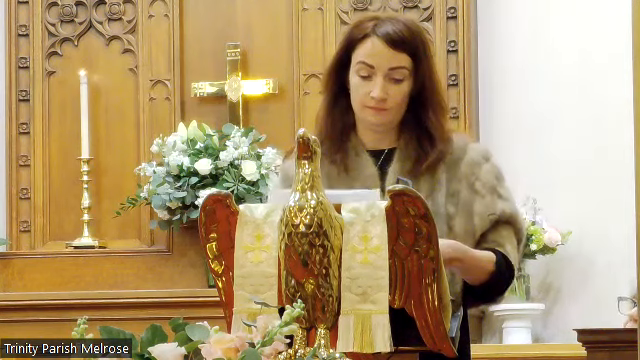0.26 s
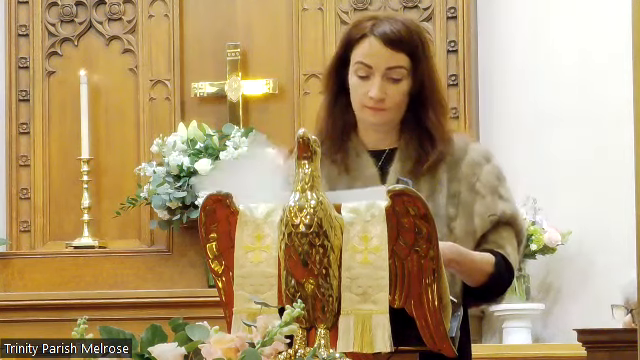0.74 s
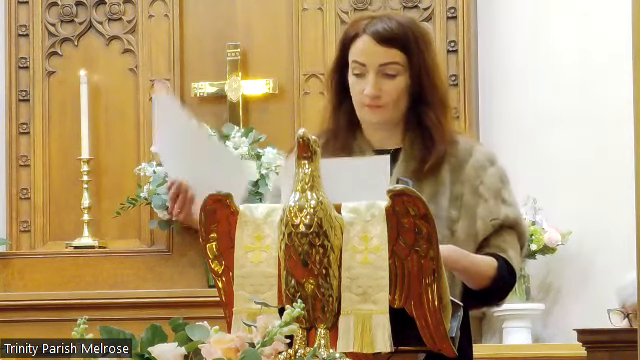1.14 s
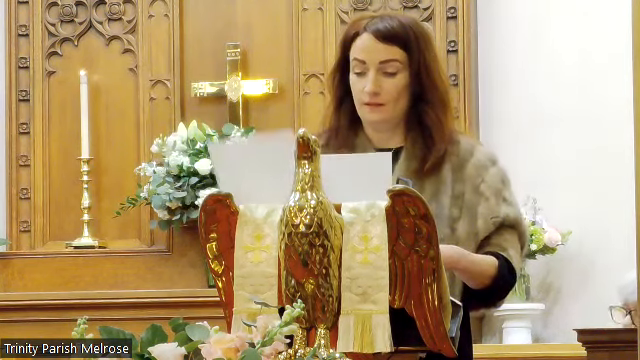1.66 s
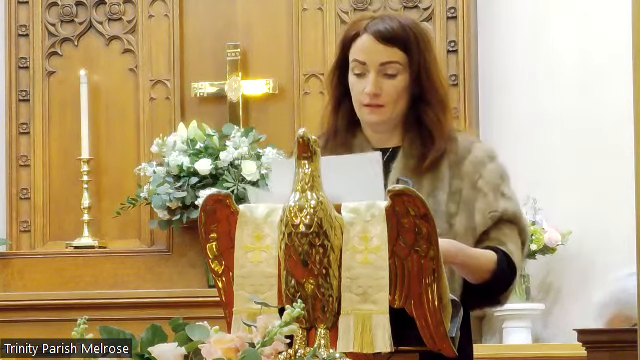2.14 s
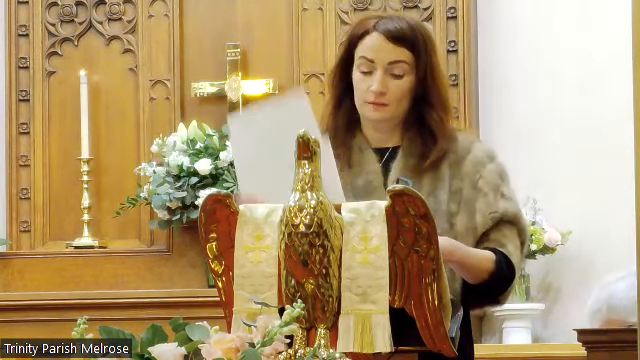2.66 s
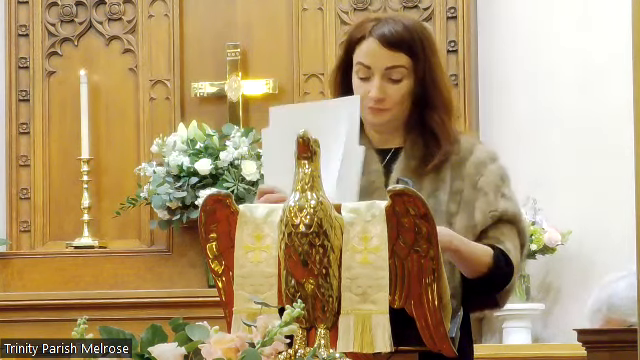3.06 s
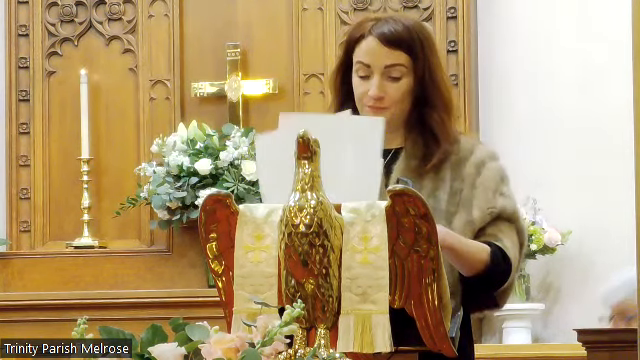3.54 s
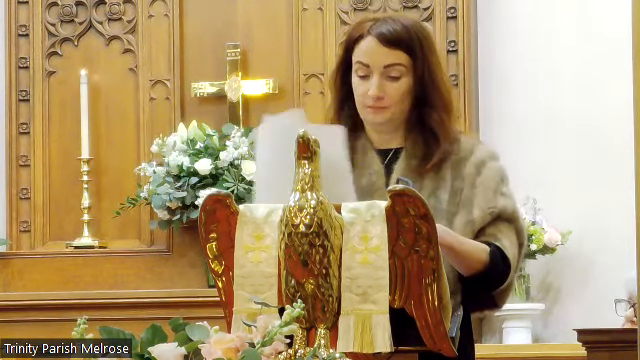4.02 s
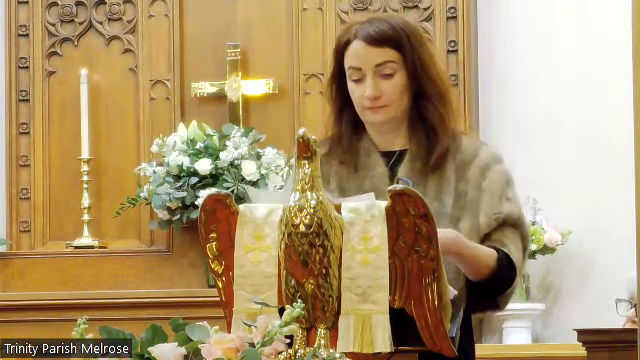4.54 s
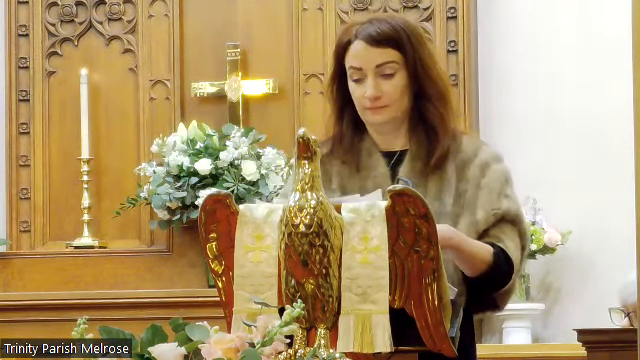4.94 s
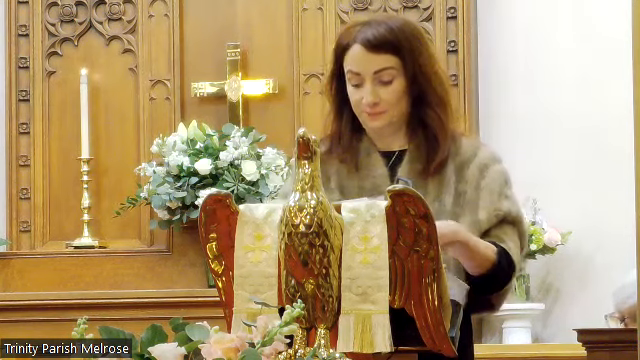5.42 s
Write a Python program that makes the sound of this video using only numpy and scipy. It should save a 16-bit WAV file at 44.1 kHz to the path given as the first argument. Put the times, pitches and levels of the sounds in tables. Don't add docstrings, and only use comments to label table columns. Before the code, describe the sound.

Sheets of paper rustle, flap and snap close to a microphone on a wooden lectern, with dull thumps and knocks in a faintly echoing hall.

```python
import sys
import numpy as np
from scipy import signal
from scipy.io import wavfile
from scipy.ndimage import uniform_filter1d

SR = 44100
rng = np.random.default_rng(int(sys.argv[2]) if len(sys.argv) > 2 else 0)


def gain_from_decibels(decibels):
    exponent = np.asarray(decibels, float) / 20
    return 10 ** exponent


def wav_out(sig):
    wavfile.write(sys.argv[1], SR, np.round(np.clip(np.atleast_2d(sig).T, -1, 1) * 32767).astype(np.int16))


N = 250926

# pitch_hz, width_hz, level_db
SHEET_RINGS = [
    [(1480, 66, -11), (1720, 202, 6)],
    [(2230, 236, 4), (2547, 250, 1.5), (2870, 310, 3), (3340, 380, 1)],
    [(4177, 400, 1), (4605, 310, 5)],
    [(5863, 320, -3.5), (6375, 540, 11)],
]
# pitch_hz, width_hz, level_db
WOOD_PARTS = [
    [(57, 71, -8.5), (89.7, 13.8, -1.5), (124, 28, -3.5)],
    [(193.3, 36, -11), (252.3, 45, -4.5), (304.5, 42, -4.5), (365, 62, -6.5)],
    [(633, 51, -15), (685.3, 70, -3), (765, 149, -2), (857, 93, -10)],
    [(1040, 226, 6), (1165.4, 68, 7)],
]
# start_s, peak_db, pitch_hz, treble_db (re peak), t60_s
CREASE_SNAPS = [(0.204, -22.5, 1810, -11.5, 0.034), (0.261, -33, 2290, -29.5, 0.018),
                (0.574, -38.5, 900, 0, 0.043), (4.205, -34.5, 660, -36, 0.024),
                (0.7445, -29.5, 2460, -12, 0.012), (0.774, -33.5, 2230, -15.5, 0.017),
                (0.791, -38.5, 2230, -11, 0.05), (1.452, -38.5, 1720, -10, 0.062),
                (1.46, -26, 1780, -20, 0.11), (1.609, -31, 1740, -28, 0.037),
                (1.88, -27, 1480, -11.5, 0.068), (2.481, -36, 1610, -31, 0.029),
                (0.459, -41.5, 1490, -27, 0.05), (0.992, -34, 1910, -16, 0.025),
                (3.576, -36, 4100, -11, 0.03), (3.003, -31, 2440, -0.5, 0.037),
                (4.31, -42, 1680, -14.5, 0.023), (2.57, -32, 1900, -8, 0.02), (1.897, -32, 1500, -10, 0.02),
                (0.17, -34, 1800, -10, 0.03), (1.952, -30, 4650, -13, 0.016),
                (4.911, -35, 2084, -12.5, 0.017), (2.979, -29, 2430, -6, 0.04),
                (3.257, -30, 3600, -22, 0.11), (3.352, -32.5, 1820, -20.5, 0.016),
                (3.618, -20.5, 2580, -58.5, 0.073), (3.838, -32.5, 648, -26, 0.034),
                (4.289, -38, 880, -31.5, 0.086), (4.35, -33.5, 3130, -5.5, 0.077),
                (4.4, -26, 3270, -19, 0.076), (4.469, -33, 2180, -12, 0.077),
                (4.582, -37.5, 2194, -6.5, 0.03), (4.87, -40, 4170, -5, 0.017),
                (5.534, -35.5, 4530, -22, 0.069)]
# start_s, peak_db, pitch_hz, crack_db (re peak), t60_s
WOOD_KNOCKS = [(0.004, -22, 118, -1.5, 0.12), (0.385, -40.5, 313.1, -15, 0.77),
               (0.567, -26.5, 273, 2, 0.061), (0.597, -35.5, 219, -12, 0.12), (1.452, -9, 116, -44, 0.089),
               (1.549, -30, 93, -23, 0.16), (1.599, -27, 94, -17, 0.16), (1.926, -40.5, 87.2, 10, 0.41),
               (3.525, -31, 213, 6, 0.053), (3.363, -23, 149, -4.5, 0.04), (3.476, -31.5, 344, 5.5, 0.097),
               (3.607, -21.5, 254.4, 2.5, 0.097), (3.697, -29, 247, 0, 0.094),
               (3.849, -37.5, 217, 11, 0.18), (3.953, -38.5, 286, 8.5, 0.14),
               (4.173, -29.5, 238, -25, 0.17), (4.209, -38.5, 253, -19, 0.17),
               (4.293, -19.5, 113.2, -29, 0.07), (4.347, -20, 110.6, -2.5, 0.18),
               (4.383, -27.5, 91, -17, 0.3)]
# time_s, pitch_hz, level_db
FINGER_SQUEAK = [
    (5.435, 540, -80),
    (5.452, 570, -50),
    (5.504, 558, -67.5),
    (5.532, 639, -52.5),
    (5.554, 762, -61.5),
    (5.572, 740, -67),
    (5.58, 660, -70),
    (5.594, 626, -75),
    (5.66, 680, -87),
]
# pitch_hz, level_db (per bin)
DUCK_THRESHOLD = [(60, -100), (105, -100), (170, -96.5), (350, -99), (1000, -64), (2000, -90), (5400, -135),
                  (8000, -100), (15000, -102)]
# peak_s, level_db, rise_s, fall_s, tilt_db (per ring)
SHEET_STROKES = [(0.004, -52, 0.72, 0.15, -1.5), (0.106, -46, 0.017, 0.057, 0.5),
                 (0.205, -56.5, 0.13, 0.046, 6.5), (0.505, -67, 0.3, 0.24, -5),
                 (0.745, -60.5, 0.76, 0.047, 2.2), (1.005, -49.5, 0.13, 0.17, 0),
                 (1.285, -86, 0.1, 0.27, -12), (1.357, -86.5, 0.49, 0.43, -10.5),
                 (1.458, -53.5, 0.016, 0.26, -7), (1.61, -73, 0.029, 0.39, -9.5),
                 (1.76, -60, 0.034, 0.66, -5), (1.877, -52, 0.018, 0.31, -2.4),
                 (2.663, -56.5, 0.88, 0.58, 0.5), (3.007, -45, 0.11, 0.16, 1.5),
                 (3.534, -66, 0.899, 0.53, -1), (3.619, -44.5, 0.041, 0.1, 1.2),
                 (3.725, -50.5, 0.16, 0.12, 0), (3.962, -53.5, 0.33, 0.13, 0.2),
                 (4.304, -51, 0.037, 0.17, 0.5), (4.919, -49.5, 0.2, 0.11, 1), (5.301, -58, 0.49, 0.07, 0.3),
                 (5.5, -65, 1, 0.043, -1),
                 (0.203, -47, 0.34, 0.17, 0.5), (0.565, -51, 0.14, 0.076, 3), (0.586, -50, 0.069, 0.025, -3),
                (0.598, -54, 0.017, 0.048, -4), (0.899, -53, 0.87, 0.15, 1.5),
                (1.492, -61.5, 0.044, 0.1, 5.5), (1.782, -63, 0.097, 0.98, 9),
                (1.99, -44, 0.058, 0.072, 4.5), (2.293, -56.5, 0.25, 0.26, 4), (1.935, -48, 0.18, 0.15, 4),
                (2.04, -53.5, 0.06, 0.18, 3.5), (2.2, -57.5, 0.015, 0.78, 0.5),
                (5.434, -50.5, 0.13, 0.032, 3), (5.29, -59.5, 0.28, 0.09, 2), (2.554, -42.5, 0.13, 0.28, 3),
                (2.981, -50, 0.013, 0.98, 1), (3.266, -46.5, 0.043, 0.58, 1.7),
                (3.482, -44.5, 0.11, 0.17, 3.5), (3.594, -51, 0.47, 0.12, 1.5),
                (4.168, -64, 0.19, 0.33, 3.5), (4.355, -43, 0.071, 0.074, 1), (4.395, -48, 0.025, 0.056, 5),
                (4.469, -47, 0.22, 0.15, 1.5), (4.59, -48, 0.067, 0.12, 3.5),
                (4.868, -52.5, 0.056, 0.16, 5.5), (5.164, -61, 0.075, 0.74, 5), (5.467, -46, 0.11, 0.16, 3),
                (5.542, -47.5, 0.04, 0.073, 2),
                 (0.517, -50, 0.0065, 0.13, 2.5), (0.609, -43.5, 0.052, 0.013, 3),
                 (0.662, -49, 0.018, 0.032, 1.5), (0.746, -49, 0.09, 0.017, 1.5),
                 (1.39, -78.5, 0.039, 0.14, 4.5), (1.3, -70, 0.013, 0.09, 3.5),
                 (2.132, -57.5, 0.08, 0.034, 4), (2.614, -49, 0.056, 0.034, 6.5),
                 (3, -45.5, 0.058, 0.019, 0.5), (2.76, -56.5, 0.32, 0.095, 3.5),
                 (3.7, -53, 0.14, 0.027, -2.5), (1.68, -74.5, 0.13, 0.15, 0.5),
                 (1.55, -68.5, 0.1, 0.077, 2.5), (3.8, -58, 0.15, 0.097, 2), (3.68, -57, 0.1, 0.1, 3),
                 (2.6, -49.5, 0.04, 0.03, 3), (2.86, -71, 0.067, 0.092, 2.5), (5.2, -65, 0.15, 0.14, 6),
                 (4.773, -68, 0.029, 0.048, 4.5), (5.105, -62, 0.044, 0.17, 2), (1.14, -79.5, 0.2, 0.4, 4),
                 (0.11, -57, 0.01, 0.081, 3), (4.838, -62.5, 0.013, 0.068, 2.5),
                 (3.96, -65.5, 0.073, 0.16, 5), (3.32, -50.5, 0.08, 0.11, 2), (2.93, -67, 0.03, 0.08, -3),
                 (0.775, -54.5, 0.008, 0.025, -1), (0.792, -49.5, 0.012, 0.08, 0.5),
                 (4.615, -50, 0.09, 0.031, 1), (3.462, -48.5, 0.015, 0.13, 5)]
# peak_s, level_db, rise_s, fall_s, place (0
WOOD_CONTACTS = [(0.001, -33, 0.1, 0.17, 0.7), (0.011, -27, 0.22, 0.028, 0.25), (0.455, -44, 1, 0.39, 1.32),
                 (0.586, -35.5, 0.095, 0.1, 0.87), (0.83, -55, 0.05, 0.3, 1.7),
                 (1.457, -27, 0.011, 0.41, 0.05), (1.465, -53.5, 0.031, 0.45, 0.05),
                 (1.523, -42.5, 0.058, 0.13, 0.76), (1.575, -31, 0.077, 0.15, 0.04),
                 (1.97, -44, 0.17, 0.24, 0.093), (2.61, -48, 0.044, 0.37, 1.39),
                 (2.8, -42, 0.11, 0.25, 1.26), (3.36, -37.5, 0.033, 0.18, 1.1),
                 (3.396, -35, 0.033, 0.19, 0.18), (3.535, -36.5, 0.34, 0.26, 1.05),
                 (3.612, -33.5, 0.04, 0.16, 1.01), (3.743, -34, 0.073, 0.073, 0.55),
                 (3.974, -44.5, 0.35, 0.15, 1.42), (4.15, -42.5, 0.028, 0.12, 0.98),
                 (4.206, -36, 0.047, 0.11, 0.9), (4.294, -28, 0.029, 0.36, 0.27),
                 (4.4, -37, 0.29, 0.25, 0.059), (4.5, -43, 0.15, 0.11, 0.27),
                 (4.626, -60.5, 0.8, 0.055, 1.6),
                 (0.017, -50.5, 0.483, 0.15, 2.43), (0.195, -48, 0.54, 0.16, 2.19),
              (1.014, -57, 0.19, 0.17, 1.78), (1.61, -50.5, 0.21, 0.56, 2.1),
              (1.894, -40, 0.019, 0.1, 2.03), (1.987, -50.5, 0.099, 0.36, 2.24),
              (2.539, -62.5, 0.11, 0.34, 3.0), (2.65, -52, 0.12, 0.087, 2.05),
              (3.004, -49.5, 0.33, 0.11, 1.36), (3.049, -60, 0.032, 0.12, 2.56),
              (3.173, -47.5, 0.11, 0.097, 1.81), (3.403, -46.5, 0.85, 0.14, 1.59),
              (3.616, -43, 0.023, 0.12, 2.55), (3.719, -46.5, 0.063, 0.069, 2.44),
              (3.853, -41.5, 0.042, 0.24, 1.54),
                 (0.126, -52, 0.04, 0.07, 2.95), (0.4, -65, 0.067, 0.19, 1.4), (0.937, -60, 0.16, 0.4, 1.9),
                 (1.279, -72, 0.2, 0.3, 1.8), (2.198, -71.5, 0.3, 0.93, 2.96),
                 (4.07, -53.5, 0.084, 0.06, 1), (4.205, -60, 0.017, 0.046, 1.4),
                 (4.37, -51, 0.16, 0.32, 2.3), (5.06, -66, 0.12, 0.36, 1.63),
                 (5.26, -73.5, 0.31, 0.14, 0.58), (0.26, -44, 0.13, 0.08, 0.83),
                 (0.53, -57, 0.036, 0.0805, 0.18), (2.12, -63, 0.056, 0.13, 1.3),
                 (2.3, -72.5, 0.3, 0.3, 1.46), (5.52, -70, 0.24, 0.32, 1.4), (1.3, -75.5, 0.32, 0.15, 1.8),
                 (4.1, -67.5, 0.17, 0.084, 2.5), (4.6, -62, 0.13, 0.16, 2.2), (0.68, -67.5, 0.2, 0.21, 2.7),
                 (3.6, -60, 0.18, 0.27, 2.4), (4.62, -58, 0.061, 0.059, 0.53),
                 (2.795, -51, 0.013, 0.076, 2)]
SHEET_DRIVE = [2, 3, 1.33, -5, -0.97]
WOOD_DRIVE = [-7.5, -2.5, -1.1, 10]
# start_s, end_s, start_hz, end_hz, depth_db
PAGE_NOTCHES = [(0, 0.52, 3900, 3900, -22), (0.2, 0.605, 2000, 1900, -16), (1.3, 1.82, 5200, 5700, -15),
                (2.1, 2.53, 5700, 5500, -6.5), (2.25, 2.52, 3530, 4100, -8), (1, 2.9, 4000, 3900, -8),
                (4.5, 4.85, 3800, 3350, -5), (-0.5, 0.15, 5300, 5300, -8), (0.8, 1.6, 3600, 3800, -10),
                (0.3, 0.58, 5000, 5400, -12), (3, 3.23, 5050, 5200, -8), (5, 4.1, 5700, 5700, -4),
                (4, 4.36, 5200, 5700, -10.5), (3.5, 4.33, 2020, 1960, -16.5), (3.95, 4.28, 4000, 3600, -5),
                (5.06, 5.4, 5420, 5430, -16), (2.7, 2.97, 1400, 1150, -18), (4.62, 5.8, 1250, 1330, -18),
                (1.2, 1.44, 1420, 1400, -18), (1.26, 1.35, 6400, 6400, -14), (4.02, 4.65, 1150, 1150, -7)]
# peak_s, level_db, rise_s, fall_s
STAND_SWAYS = [
    (0.92, -75.5, 0.33, 0.26),
    (1.78, -51, 0.12, 0.22),
    (2.15, -67, 0.13, 0.29),
    (2.47, -74, 0.15, 0.3),
    (4.7, -66.5, 0.2, 0.27),
    (4.95, -77, 0.15, 0.2),
    (5.24, -73.5, 0.22, 0.13),
    (3.0, -76, 0.28, 0.3),
]
# peak_s, level_db, rise_s, fall_s, pitch_hz
CONTACT_GROANS = [(0.725, -57, 0.02, 0.08, 305), (0.815, -49, 0.035, 0.14, 345),
                  (0.77, -55.5, 0.08, 0.13, 400), (0.82, -59, 0.045, 0.085, 750),
                  (0.98, -60, 0.12, 0.12, 645), (1.29, -66, 0.07, 0.13, 1400), (1.2, -66, 0.12, 0.14, 1710),
                  (1.39, -77, 0.05, 0.06, 4680), (1.4, -80, 0.08, 0.06, 7700), (2.68, -46, 0.1, 0.03, 308),
                  (2.62, -51, 0.035, 0.08, 312), (2.785, -48, 0.07, 0.067, 310),
                  (2.835, -43.5, 0.056, 0.038, 185), (2.8, -52, 0.042, 0.091, 770),
                  (3.0, -55, 0.071, 0.092, 345), (3.18, -52.5, 0.052, 0.15, 370),
                  (3.285, -48, 0.07, 0.08, 1700), (2.06, -59.5, 0.047, 0.096, 350),
                  (4.62, -60, 0.083, 0.085, 280), (5.6, -70, 0.11, 0.077, 630),
                  (4.31, -49, 0.03, 0.043, 790)]

STROKE_SPAN_DB = 30
STROKE_BEND = 1.044


def unit(x):
    return x / np.sqrt(np.mean(x ** 2))


def band(x, hz, width):
    edges = np.sqrt(hz ** 2 + width ** 2 / 4) + np.array([-width, width]) / 2
    return signal.sosfilt(signal.butter(2, edges, "band", fs=SR, output="sos"), x)


def highpass(x, order, hz):
    return signal.sosfilt(signal.butter(order, hz, "high", fs=SR, output="sos"), x)


def smooth(x, k):
    return uniform_filter1d(uniform_filter1d(x, k), k)


def walk(rate):
    k = int(SR / rate)
    held = np.repeat(rng.standard_normal(N // k + 1), k)
    return 0.87 * smooth(held, k)[:N]


def patchwork(shape, frames, bins):
    patches = uniform_filter1d(rng.standard_normal(shape), size=frames, axis=1)
    return unit(uniform_filter1d(patches, size=bins, axis=0))


def add(out, s, sound):
    i = int(s * SR)
    out[i:i + len(sound)] += sound[:N - i]


def strokes(rows, share_db):
    s, db, rise, fall = np.transpose(rows)[:4, :, None]
    t = np.arange(0, N + 64, 64) / SR
    distance = np.where(t < s, (s - t) / rise, (t - s) / fall)
    swell_db = db - STROKE_SPAN_DB * np.abs(distance) ** STROKE_BEND
    power = gain_from_decibels(share_db) ** 2 @ gain_from_decibels(swell_db) ** 2
    return [np.interp(np.arange(N) / SR, t, 10 * np.log10(p + 1e-13)) for p in power]


def friction(rate, spread_db, grit_db, flutter_hz, flutter_db):
    size = gain_from_decibels(spread_db * np.minimum(rng.exponential(size=N), 2.1))
    slips = (rng.random(N) < rate / SR) * rng.choice([-1, 1], N) * size
    grain = rng.standard_normal(N) + gain_from_decibels(grit_db) * unit(slips)
    return gain_from_decibels(flutter_db * walk(flutter_hz)) * grain


def ring(push, parts, levels_db, patchy_db, patch_rate, firm_db, blur, bent=unit):
    out = 0
    for modes, db in zip(parts, levels_db):
        clear = 0
        for k, (hz, width, mode_db) in enumerate(modes):
            tone = unit(band(band(push, hz, 0.98 * width), hz, width))
            clear = clear + (-1) ** k * gain_from_decibels(mode_db + patchy_db * walk(patch_rate)) * tone
        low, high = modes[0][0] / blur, modes[-1][0] * blur
        middle = np.sqrt(low * high)
        broad = band(band(push, middle, 2.17 * (high - low)), middle, high - low)
        share = 0.4 + 0.6 / (1 + gain_from_decibels(firm_db - db) ** 3)
        out = out + gain_from_decibels(db) * (np.sqrt(1 - share) * bent(clear) + np.sqrt(share) * bent(broad))
    return out


def air():
    return gain_from_decibels(-77) * rng.standard_normal(N)


def hall(x):
    t60_s, level_db, top_hz = 0.7, -17.5, 3700
    t = np.arange(SR) / SR
    noise = band(rng.standard_normal(SR), top_hz / 3, top_hz)
    tail = (t > 0.018) * gain_from_decibels(-60 * t / t60_s) * noise
    return gain_from_decibels(level_db) * signal.fftconvolve(x, tail / np.sqrt(np.sum(tail ** 2)))[:N]


def stand_hum(push):
    sway_db, = strokes(STAND_SWAYS, np.zeros((1, len(STAND_SWAYS))))
    level = np.hypot(gain_from_decibels(-85.5), gain_from_decibels(sway_db)) * gain_from_decibels(1.5 * walk(6.3))
    hz, width = WOOD_PARTS[0][1][:2]
    return level * unit(band(push, hz, width))


def rubbing():
    push = friction(rate=300, spread_db=11.5, grit_db=-7.0, flutter_hz=30.24, flutter_db=-0.5)
    rows = np.array(WOOD_CONTACTS)
    away = abs(np.arange(len(WOOD_PARTS))[:, None] - rows[:, -1])
    neighbour_db = -14.5
    stand_db, *top_db = strokes(rows, np.array(WOOD_DRIVE)[:, None] + neighbour_db * away)
    levels_db = [np.minimum(stand_db, -42), *top_db]
    wood = ring(push, WOOD_PARTS, levels_db, patchy_db=5.0, patch_rate=11, firm_db=-46.0, blur=1.077)
    return stand_hum(push) + wood


def groans():
    wobble, flutter_db = 0.11, 6
    out, t = np.zeros(N), np.arange(-8000, 12000) / SR
    drift, flutter = walk(90), walk(75)
    for s, db, rise, fall, hz in CONTACT_GROANS:
        at = np.clip(((s + t) * SR).astype(int), 0, N - 1)
        swell_db = db - STROKE_SPAN_DB * np.where(t < 0, -t / rise, t / fall) ** 2
        cycles = hz * np.cumsum(1 + wobble * np.sqrt(300 / hz) * drift[at]) / SR
        level = np.sqrt(2) * gain_from_decibels(swell_db + flutter_db * flutter[at])
        add(out, s + t[0], level * np.sin(2 * np.pi * cycles))
    return out


def squeak():
    t = np.arange(N) / SR
    s, hz, db = np.transpose(FINGER_SQUEAK)
    pitch, level_db = np.interp(t, s, hz), np.interp(t, s, db)
    on = uniform_filter1d(1. * (t > s[0]) * (t < s[-1]), size=300)
    cycles = np.cumsum(pitch * (1 + 0.0697 * walk(240))) / SR
    return 1.38 * on * gain_from_decibels(level_db + 4.2 * walk(110)) * np.sin(2 * np.pi * cycles)


def knocks():
    out, t = np.zeros(N), np.arange(16000) / SR
    rise = 1 - np.exp(-(t / 0.009) ** 3)
    for s, db, hz, crack_db, t60 in WOOD_KNOCKS:
        body = gain_from_decibels(-60 * t / t60) * np.sin(2 * np.pi * hz * t)
        heavy = hz < 160
        stand = heavy * 0.17 * gain_from_decibels(-60 * t / 0.277) * np.sin(2 * np.pi * WOOD_PARTS[0][1][0] * t)
        noise = rng.standard_normal(len(t))
        crack = 0.58 * gain_from_decibels(crack_db - 60 * t / 0.056) * unit(band(noise, 756, 480))
        add(out, s, gain_from_decibels(db) * rise * (body + stand + crack))
    return out


def snaps():
    out, t = np.zeros(N), np.arange(6000) / SR
    rise = 1 - np.exp(-t / 0.000093)
    for s, db, hz, treble_db, t60 in CREASE_SNAPS:
        noise = rng.standard_normal(len(t))
        pop = 0.3 * gain_from_decibels(-60 * t / 0.035) * np.sin(2 * np.pi * hz * t)
        chirp = np.sin(2 * np.pi * hz * t * (0.915 + 45 * t))
        pop = pop + 0.64 * np.exp(-((t - 0.0014) / 0.001) ** 2) * chirp
        treble = 1.42 * gain_from_decibels(treble_db) * unit(band(noise, 5500, 3700))
        rustle = 0.29 * unit(band(noise, hz, 0.7 * hz)) + treble
        snap = rise * (pop + gain_from_decibels(-60 * t / t60) * rustle)
        add(out, s, gain_from_decibels(db) * highpass(snap, 2, hz / 2))
    return out


def sliding():
    push = friction(rate=400, spread_db=5.5, grit_db=-4.5, flutter_hz=70, flutter_db=2.5)
    bright = highpass(push, 6, 7100)
    hiss = unit(band(bright, 6870, 3300)) + gain_from_decibels(3) * unit(band(bright, 8450, 6300))
    warp = np.cumsum(1 + 0.045 * walk(6))

    def bent(x):
        return unit(np.interp(warp * N / warp[-1], np.arange(N), x))

    rows = np.array(SHEET_STROKES)
    step = np.arange(len(SHEET_DRIVE))[:, None] - 2
    *rings_db, hiss_db = strokes(rows, np.array(SHEET_DRIVE)[:, None] + step * rows[:, -1])
    rings = ring(push, SHEET_RINGS, rings_db, patchy_db=4, patch_rate=12, firm_db=-52, blur=1.09, bent=bent)
    return rings + gain_from_decibels(hiss_db + 1.7 * walk(23.87)) * bent(hiss)


def shade(x):
    patchy_db, from_hz, notch_width, fade_s = 2.5, 3500, 0.075, 0.022
    hz, t, z = signal.stft(x, SR, nperseg=512)
    hz = hz[:, None]
    db = patchy_db * patchwork(z.shape, 7, 8) / (1 + (from_hz / (hz + 1)) ** 4)
    for start, end, hz0, hz1, depth_db in PAGE_NOTCHES:
        on = np.clip(np.minimum(t - start, end - t) / fade_s, 0, 1)
        centre = np.interp(t, [start, end], [hz0, hz1])
        db = db + depth_db * on * np.exp(-((hz / centre - 1) / notch_width) ** 2)
    return signal.istft(z * gain_from_decibels(db), SR, nperseg=512)[1][:N]


def scene():
    near = rubbing() + groans() + squeak() + knocks() + snaps() + shade(sliding())
    mono = air() + hall(near) + near
    return np.array([mono, mono])


def suppress(x):
    depth_db, waver_db, learn_db, focus_hz, octaves = -22, 8, -11, 3000, 1.63
    hz, _, z = signal.stft(x, SR, nperseg=1024)
    power = uniform_filter1d(uniform_filter1d(abs(z) ** 2, 3, axis=1), 3, axis=0)
    duck_hz, duck_db = np.transpose(DUCK_THRESHOLD)
    limit = gain_from_decibels(np.interp(np.log(hz + 1), np.log(duck_hz), duck_db))[:, None] ** 2
    focus = np.exp(-(np.log2((hz + 1) / focus_hz) / octaves) ** 4)[:, None]
    recent = signal.lfilter([0.04], [1, -0.96], power, axis=1)
    learnt = focus * gain_from_decibels(learn_db) ** 2 * recent
    waver = gain_from_decibels(waver_db * focus * patchwork(z.shape, 14, 4)) ** 2
    gain = power / (power + (limit + learnt) * waver)
    return signal.istft(z * np.maximum(gain, gain_from_decibels(depth_db)), SR, nperseg=1024)[1][:N]


def band_limit(x):
    return signal.sosfilt(signal.butter(12, 15170, fs=SR, output="sos"), x)


def record(dry):
    mic = signal.sosfilt(signal.butter(4, 12100, fs=SR, output="sos"), dry[0])
    clean = suppress(mic)
    return band_limit(np.array([clean, clean]))


dry = scene()
out = record(dry)
wav_out(out)
```